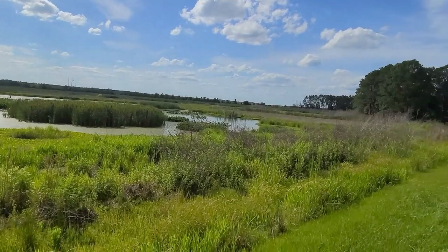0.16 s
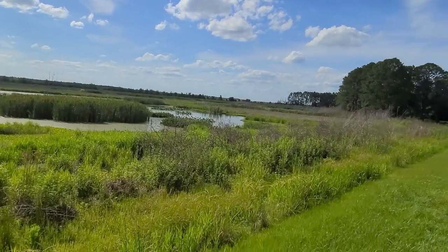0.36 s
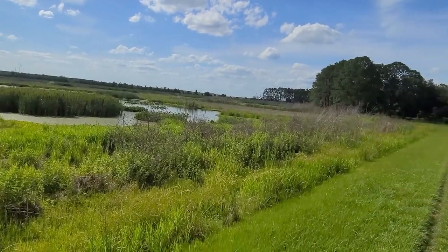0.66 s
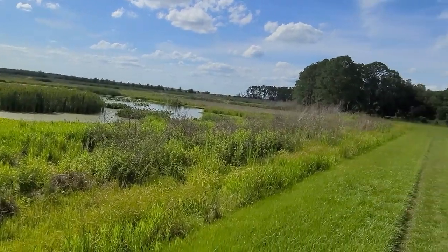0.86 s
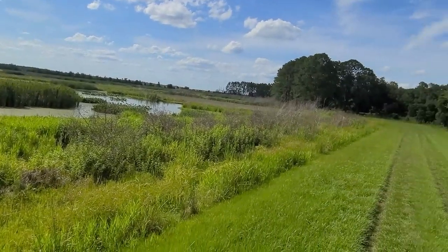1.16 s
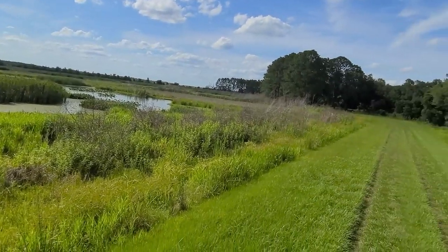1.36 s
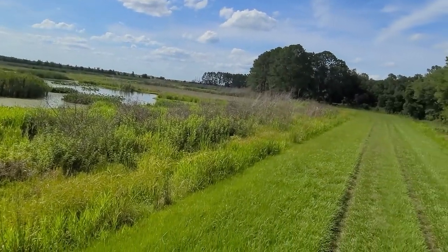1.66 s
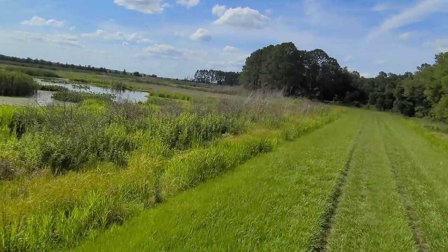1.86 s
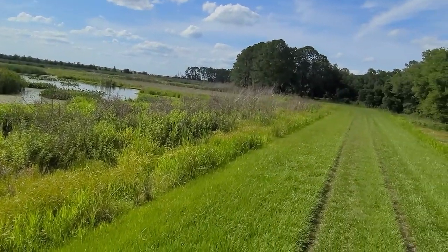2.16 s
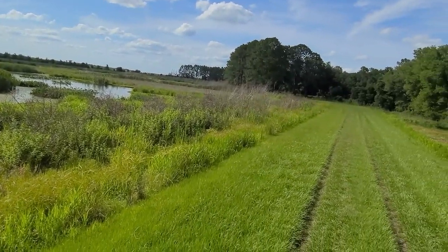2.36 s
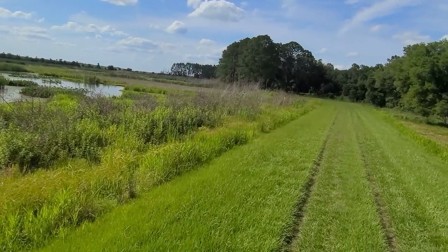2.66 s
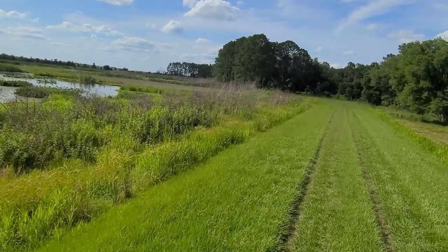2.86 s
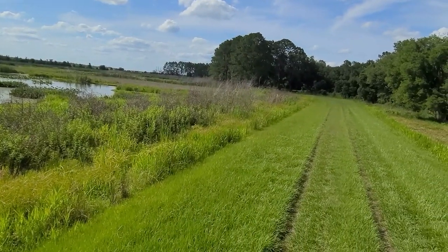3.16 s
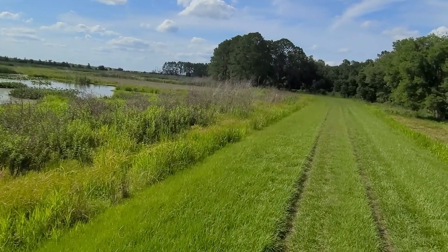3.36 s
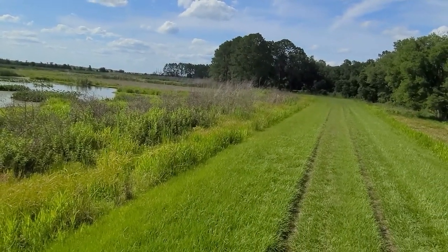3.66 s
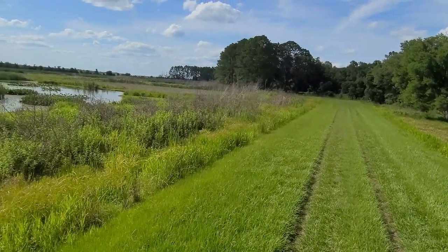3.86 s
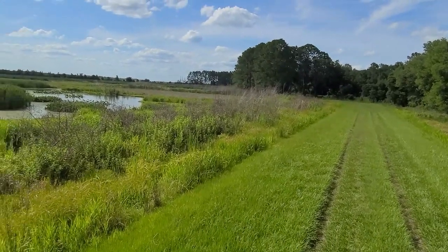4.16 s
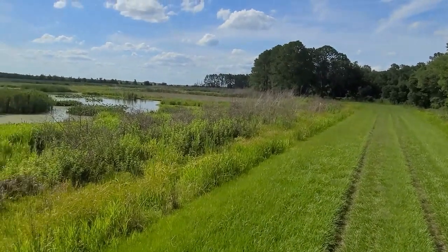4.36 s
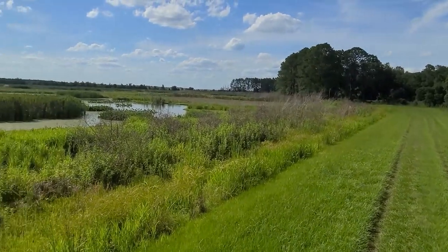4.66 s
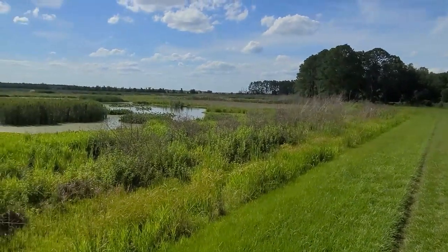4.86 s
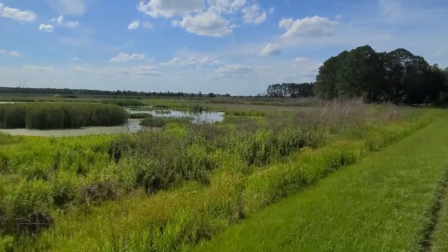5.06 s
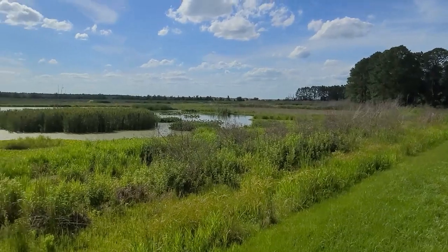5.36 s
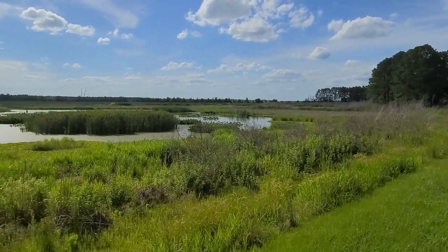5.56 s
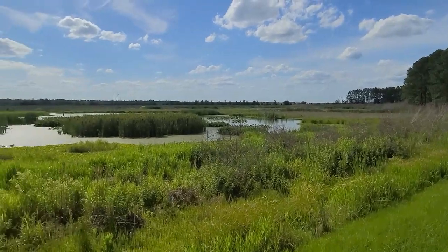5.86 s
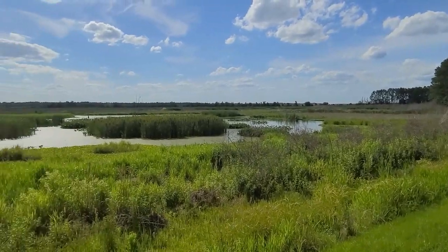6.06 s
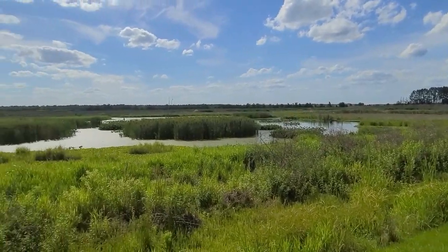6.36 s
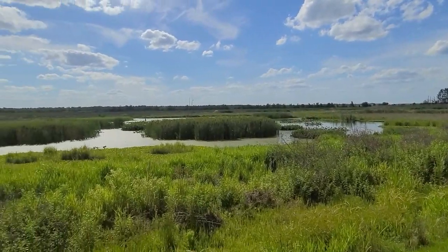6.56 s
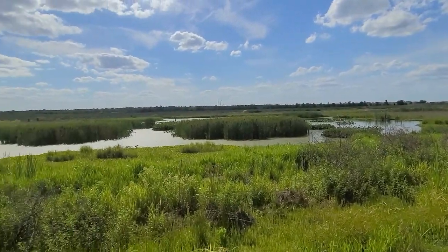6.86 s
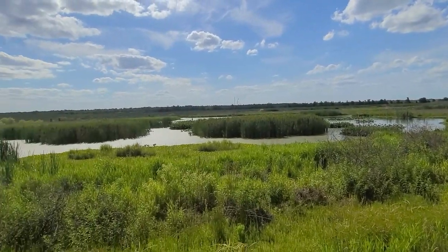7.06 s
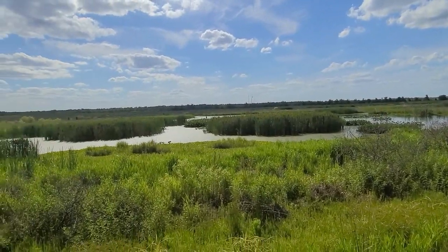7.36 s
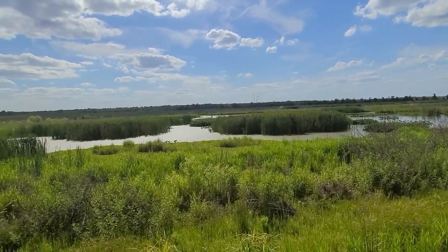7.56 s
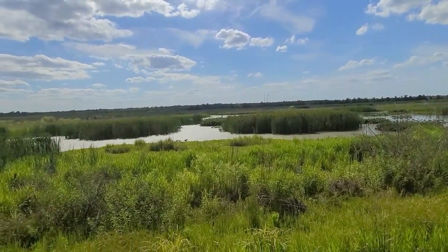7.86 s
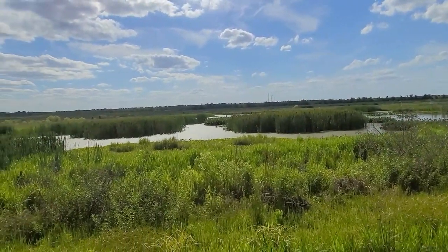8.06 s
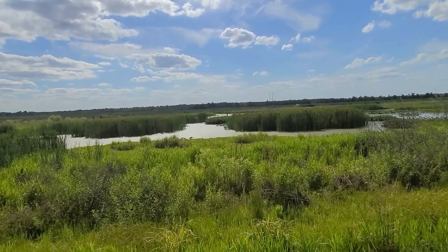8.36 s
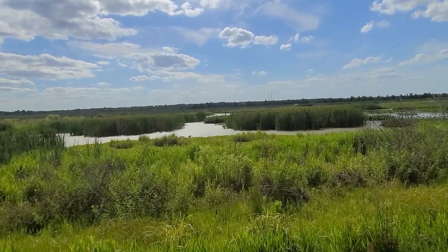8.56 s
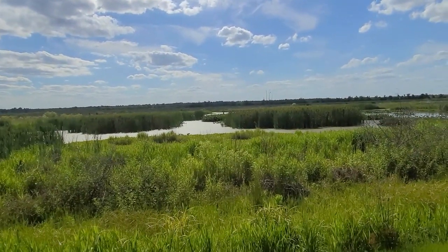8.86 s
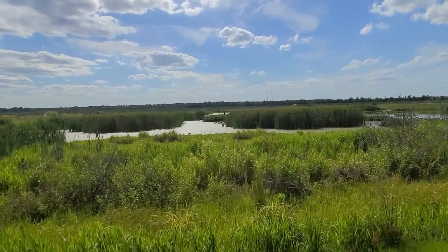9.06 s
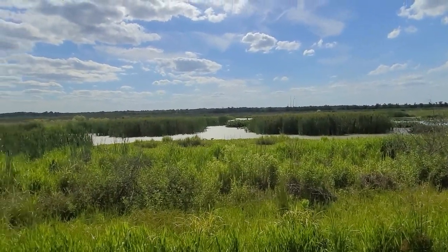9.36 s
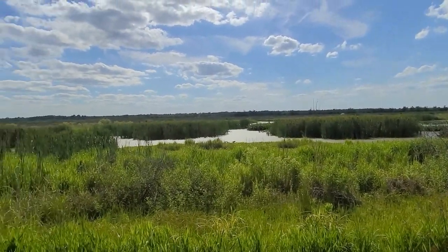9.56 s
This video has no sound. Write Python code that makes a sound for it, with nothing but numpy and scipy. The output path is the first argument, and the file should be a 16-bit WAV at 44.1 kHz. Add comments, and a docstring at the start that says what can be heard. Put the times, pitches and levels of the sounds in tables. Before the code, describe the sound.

High insect buzz hangs over an open marsh while low wind gusts rumble, birds whistle and twitter faintly, and handling clicks crowd the end.

```python
"""An open marsh: katydids buzz in the grass beside it, heard from a hand-held camera that pans slowly.
Two near katydids rasp by scraping a file of teeth, over a far chorus of coloured noise.
A bird whistles slurred notes on gliding sines; a farther songbird twitters.
Gusts of low noise rumble on the microphone and die down, over a breeze and a wash of far air.
The case clicks and bumps in the hand as ringing modes and noise puffs; fingers rub it in tiny slips."""
import sys
import numpy as np
from scipy import signal
from scipy.fft import rfft, irfft, next_fast_len
from scipy.io import wavfile
from scipy.ndimage import uniform_filter1d

SR = 44100
rng = np.random.default_rng(int(sys.argv[2]) if len(sys.argv) > 2 else 0)


def digitize_waveform(pressure):
    """Quantize a signal to 16-bit integers and store it at the path in sys.argv[1].

    Rows of a 2-D input are taken as channels; values are limited to [-1, 1].
    """
    field = np.atleast_2d(pressure).T
    bounded = np.clip(field, -1, 1)
    quanta = np.round(bounded * 32767).astype(np.int16)
    wavfile.write(sys.argv[1], SR, quanta)


N = 428192
T = np.arange(N) / SR  # [s]

# Spectra below set colour only: their levels are relative. Layer levels are before any trim in the mix.

# wing stroke of the steady katydid: (share of cycle, pitch [Hz], relative level [dB])
STEADY_STROKE = [(0, 9590, -23), (.1, 9943, -2.5), (.25, 10300, -6), (.4, 10380, -6.5), (.52, 9790, -6.5),
                 (.66, 9180, -15), (.78, 9017, -24)]
# wing stroke of the verse singer, before each verse's pitch factor: (share of cycle, pitch [Hz], relative level [dB])
VERSE_STROKE = [(0, 8720, 2.5), (.08, 8370, -2.5), (.22, 8045, -4), (.36, 7650, 0), (.52, 7080, -21)]
# loudness of the steady katydid: (time [s], level [dB])
STEADY_LEVEL = [(0, -63), (1.4, -55), (2.3, -62), (4, -71), (5.2, -51), (6.3, -55.5), (7.4, -58.5),
                (8.5, -52.5), (9.7, -56)]
# verses of the lower katydid, each held until a short pause before the next: (start [s], level [dB], pitch factor)
VERSES = [(-.2, -70, 0.91), (.48, -70, 0.92), (1.25, -66.5, 0.97), (2.12, -66.5, 0.97), (2.95, -64.5, 0.99),
          (3.74, -62.5, 1.04), (4.62, -61, 1.03), (5.5, -66.5, 0.98), (6.32, -62, .99), (7.22, -61.5, 1.04),
          (8.16, -59.5, 1.034), (9.02, -62, 1.02)]
VERSE_PAUSE_S = 0.09
STEADY_ECHO_DB, VERSE_ECHO_DB = -1, -3  # echoes relative to the direct sound

# long calls of the near bird: (start [s], level [dB], change of level from start to end [dB])
UPSLURS = [(0.071, -50, -2.5), (8.812, -60.5, -1), (9.555, -61, 14)]
# shape of that call, a dip and then a climb: (share of call, pitch [Hz], relative level [dB])
UPSLUR_SHAPE = [(0, 3100, -2), (.08, 3150, -0.5), (.16, 2950, -2), (.27, 2870, -11), (.35, 3060, -6),
                (.45, 3044, -8), (.52, 3200, 0.5), (.66, 3340, -2), (.8, 3650, -2), (1, 4570, -15)]
UPSLUR_S = 0.23  # length of the call
# short arched notes of the near bird:
# (start [s], length [s], start pitch [Hz], end pitch [Hz], arch [Hz], crest [share of length], level [dB])
NOTES = [(0, 0.071, 2280, 2310, 40, .5, -66.5), (0.571, 0.14, 1965, 1600, 35, 0.46, -72),
         (1.022, 0.22, 1734, 1510, 290, 0.29, -63.5), (8.836, 0.069, 4380, 4340, 57, .3, -60),
         (9.078, 0.041, 1790, 1614, 11, .5, -58), (9.295, 0.046, 2120, 2140, 190, .5, -58),
         (9.438, 0.11, 2150, 2230, 112, 0.62, -58.5)]
# twitters of the far songbird: (time [s], start pitch [Hz], end pitch [Hz], level [dB])
TWITTERS = [(2.07, 4000, 3700, -72), (2.28, 3770, 3340, -67), (2.51, 3230, 3650, -71),
            (4.15, 2770, 3240, -70.5), (4.85, 2750, 3200, -68), (4.925, 2720, 2470, -70),
            (5.03, 2850, 2550, -67), (5.085, 2810, 3250, -65), (5.263, 2740, 2610, -65.5),
            (5.318, 2840, 3250, -63), (5.485, 3700, 2600, -63.5), (5.558, 2930, 3150, -69),
            (5.605, 3400, 3620, -70), (5.795, 3150, 2980, -72)]
PITCH_WAVER = .006  # rms share by which a whistle's pitch trembles

# colour of the wind in a gust: (frequency [Hz], density [dB per Hz])
BUFFET = [(3, -7), (15, -16), (40, -5), (68, 3.5), (100, -5.5), (135, -21.5), (180, -32.5), (300, -48.5),
          (1000, -100)]
# colour of the wind between gusts: (frequency [Hz], density [dB per Hz])
BREEZE = [(3, -50), (15, -10), (35, -1), (62, 3), (85, -7.5), (120, -16.5), (200, -36.5), (800, -91)]
# light breeze that never stops: (time [s], level [dB])
BREEZE_LEVEL = [(0, -41.5), (1.5, -41), (2.2, -42.5), (3.5, -40), (4.7, -49), (6.7, -50.5), (7.3, -47),
                (9.7, -46)]
# gusts on top of the breeze: (middle [s], length [s], level [dB])
GUSTS = [(.34, 0.09, -31), (.475, 0.065, -29), (.665, 0.15, -29), (.94, 0.044, -37.5), (1.11, 0.055, -29),
         (1.84, 0.19, -37.5), (2.54, 0.093, -28), (2.94, 0.2, -28.5), (3.4, 0.22, -34), (3.635, 0.079, -30),
         (3.755, 0.045, -29), (4.135, 0.04, -34), (7.18, 0.42, -42), (7.77, 0.33, -41), (8.9, 0.3, -43)]
# side that the wind strikes: (time [s], left minus right [dB])
WIND_SIDE = [(0, -4.5), (1.8, -5.5), (2.1, 2.5), (3.8, 1), (4.1, -10.5), (5.2, -1), (9.7, 1.5)]

# snaps of the case under the hand: (time [s], crack level [dB], brightness [dB per octave], knock level [dB])
SNAPS = [(0.5488, -23, 1.4, -32), (1.9429, -34, -1, -33.5), (4.2937, -27, 1.5, -45.5),
         (6.535, -36, -3, -42), (6.791, -40.5, -4, -50), (6.8014, -31, 1, -42.5), (6.8345, -41.5, -2, -46),
         (6.9094, -37, 2, -46), (6.948, -46, 0, -49), (6.9684, -38, -6, -44.5), (7.354, -50, 2, -50),
         (7.659, -44, -5, -44), (7.8657, -44.5, 0, -44), (7.9328, -38, 1.5, -54), (8.019, -42.5, 2.5, -52),
         (8.0577, -41, -5, -48), (8.0871, -37, -3.5, -42), (8.1296, -36, -2, -48), (8.171, -34, -4, -40),
         (8.1822, -29.5, .5, -50), (8.2016, -35.5, -7, -34.5), (8.2227, -36, -7, -39.5),
         (8.273, -39, 2.5, -51), (8.3258, -34, -1.5, -47), (8.358, -54, -9, -43.5), (8.7, -37.5, 0.5, -46),
         (8.758, -33, -5.5, -41), (8.8906, -44, -3, -35.5), (8.9854, -37.5, 0, -46), (8.997, -37, -6, -41),
         (9.1998, -44, -11, -43.5), (9.303, -42, -8, -44), (9.3455, -38, -10, -43), (9.407, -41, -1, -41),
         (9.4156, -33.5, -4, -38.5), (9.6438, -37.5, -1.5, -48)]
# dull bumps of the hand against the case: (time [s], level [dB])
BUMPS = [(7.177, -41), (7.1912, -34.5), (8.2011, -32.5)]
# hollow modes of the case, varied at each strike: (frequency [Hz], level [dB], t60 [s])
KNOCK_MODES = [(222, -11, 0.054), (446, 1.5, 0.056), (588, -8, 0.026)]
# ringing modes of its shell, varied at each strike: (frequency [Hz], level [dB], t60 [s])
SHELL_MODES = [(1182, -7.5, 0.071), (1450, -10, 0.08), (1735, 1, 0.035), (2455, -4.5, 0.025),
               (2720, -6, 0.057), (3004, -2, 0.041), (3324, -6, 0.051), (4000, -8, 0.033),
               (4440, -1.5, 0.03), (7070, -5, 0.012)]
# colour of a sharp crack: (frequency [Hz], density [dB per Hz])
CRACK = [(100, -25), (800, -10), (1300, 3), (1750, 5), (2250, 3), (3200, 0.5), (4500, -3), (6000, -5),
         (11500, -10.5), (15000, -26)]
# colour of a dull bump: (frequency [Hz], density [dB per Hz])
BUMP = [(60, -8), (210, 4.5), (350, -3), (570, 4), (850, -14.5), (1400, -22), (3000, -28), (15000, -65)]
CRACK_T60_S = .03
SHELL_DETUNE, KNOCK_DETUNE = .015, .035  # rms share by which the grip shifts the modes
SETTLE_PER_S, SETTLE_DB, SETTLE_T60_S = 220, -20, .12  # small slips that follow a snap
TILT_FROM_HZ, TILT_PIVOT_HZ = 1000, 2500  # brightness slopes above the first, pivoting on the second
EDGE_HZ = 15800  # top of the band

# fingers shifting on the case: (middle [s], length [s], level [dB])
GRIPS = [(6.97, 0.1, -57.5), (7.44, 0.19, -57), (7.95, 0.29, -63), (8.22, 0.27, -53.5), (8.88, 0.36, -54.5),
         (9.56, 0.33, -58)]
# soft scuffs where the skin slides freely: (middle [s], length [s], level [dB])
SCUFFS = [(6.955, 0.078, -57), (7.49, 0.048, -54), (8.22, 0.056, -49.5)]
# colour of the rubbing: (frequency [Hz], density [dB per Hz])
RUB = [(50, -27), (170, 4), (300, -4), (460, 9), (620, 1), (850, -9.5), (1250, 1.5), (2000, -19),
       (3000, -10), (5000, -25), (15000, -43)]
SLIP_T60_S, SLIP_ECHO_DB = .04, 2

# colour of the far air: (frequency [Hz], density [dB per Hz])
AIR = [(80, -3), (180, -5), (300, 1), (480, -0.5), (750, -6), (1100, -11), (2000, -18.5), (3200, -20.5),
       (4500, -25.5), (6500, -30.5), (12000, -56)]
# loudness of the far air over the marsh: (time [s], level [dB])
AIR_LEVEL = [(0, -59.5), (3, -60.5), (6, -59.5), (7.5, -58), (9.7, -56)]
# stereo width of the far air: (time [s], share of unrelated noise [0-1])
AIR_WIDTH = [(0, 0.43), (1.3, 0.64), (4.1, 0.7), (4.5, 0.04), (6.5, 0.02), (7.3, 0.92), (9.7, 0.6)]
# colour of the faint hiss: (frequency [Hz], density [dB per Hz])
HISS = [(1000, -15), (4800, -4.5), (5500, 3), (6400, -4.5), (12000, -3), (14000, 1), (15600, 2.5)]
# colour of the far katydid chorus: (frequency [Hz], density [dB per Hz])
CHORUS = [(5000, -74), (6500, -61), (7000, -19), (7400, -16.5), (7900, -11.5), (8800, -10.5), (9300, -8),
          (9700, -1), (10000, -1), (10120, 1.5), (10230, 0), (10340, 4), (10480, -4.5), (10700, -8),
          (11000, -31), (11600, -60)]
# loudness of the far chorus: (time [s], level [dB])
CHORUS_LEVEL = [(0, -50), (1.4, -50), (2.4, -51.5), (4.2, -50.5), (5.2, -53.5), (6.5, -51), (8.3, -51.5),
                (9.7, -51)]
# likeness of diffuse noise at the two ports: (frequency [Hz], correlation [-1 to 1])
PORT_LIKENESS = [(60, 0.2), (110, 0), (170, 0.5), (280, 1), (500, 0.67), (740, 0.61), (1100, 0.3),
                 (2500, 0)]


def gain_of(db):
    """Decibels to amplitude."""
    return 10 ** (np.asarray(db) / 20)


def evened(x):
    """Scales to an rms of one."""
    return x / np.sqrt(np.mean(x ** 2) + 1e-20)


def read(points, hz):
    """Reads a spectrum table at any frequency, on a logarithmic pitch axis."""
    table_hz, value = np.transpose(points)
    return np.interp(np.log(hz + 1), np.log(table_hz + 1), value)


def follow(rows, t=T):
    """Every column of a curve at the times (or shares) t."""
    knots, *columns = np.transpose(rows)
    return [np.interp(t, knots, column) for column in columns]


def add(mix, s, sound):
    """Lays a sound into the mix at time s."""
    part = mix[..., max(round(s * SR), 0):][..., :sound.shape[-1]]
    part += sound[..., :part.shape[-1]]


def placed(x, left_db):
    """Sets the balance between the two ports, left minus right in dB."""
    return x * gain_of(np.array([left_db, -left_db]).reshape(2, -1) / 2)


def drift(hz):
    """Slow chance of rms one, moving up to about hz times a second."""
    count = int(2 * hz * T[-1]) + 4
    knots = signal.resample_poly(rng.standard_normal(count), up=4, down=1)
    return evened(np.interp(T, np.linspace(0, T[-1], len(knots)), knots))


def coloured(x, spectrum):
    """Filters by a spectrum table."""
    size = next_fast_len(x.shape[-1], True)
    gain = gain_of(read(spectrum, np.fft.rfftfreq(size, 1 / SR)))
    return irfft(rfft(x, size) * gain, size)[..., :x.shape[-1]]


def noise(spectrum, lag_s=0):
    """Diffuse noise whose likeness at the two ports varies with pitch, the left one late by lag_s."""
    hz = np.fft.rfftfreq(next_fast_len(N, True), 1 / SR)
    shared, private = rng.standard_normal((2, 2 * len(hz))).view(complex)
    same = np.clip(read(PORT_LIKENESS, hz), -1, 1)
    left = shared * np.exp(-2j * np.pi * hz * lag_s)
    right = same * shared + np.sqrt(1 - same ** 2) * private
    return evened(irfft(np.array([left, right]) * gain_of(read(spectrum, hz)))[:, :N])


def scattered(x, t60, wet_db, turn_s=0.6986):
    """The direct sound plus echoes from its surroundings, whose paths change as the camera turns."""
    t = T[:SR // 3]
    tails = rng.standard_normal((3, 2, len(t))) * gain_of(-60 * t / t60)
    tails /= np.linalg.norm(tails, axis=2, keepdims=True)
    # three sets of echoes fade into one another
    shares = np.cos(np.pi * (T / turn_s + np.arange(3)[:, None] / 3)) * np.sqrt(2 / 3)
    echoes = np.zeros((2, N))
    for share, tail in zip(shares, tails):
        echoes += signal.oaconvolve((x * share)[None], tail, axes=1)[:, :N]
    return (x + gain_of(wet_db) * echoes) / np.hypot(1, gain_of(wet_db))


def swells(rows, squareness):
    """Amplitude of pushes that each build, hold and let go; they add in power."""
    power = np.zeros(N)
    for middle, length, level_db in rows:
        power += gain_of(level_db) ** 2 * np.exp(-abs(2 * (T - middle) / length) ** squareness)
    return np.sqrt(power)


def katydids(swell_s=0.2, last_verse_s=0.76):
    """Two wing-raspers: one buzzes without a break, a lower one sings in verses."""
    steady = wings(STEADY_STROKE, strokes_hz=69.06, wander=0.00403, rasp=.013, unevenness_db=1.46)
    steady *= gain_of(follow(STEADY_LEVEL)[0] + 0.5)
    effort, pitch = np.zeros(N), np.ones(N)
    ends = [row[0] - VERSE_PAUSE_S for row in VERSES[1:]] + [VERSES[-1][0] + last_verse_s]
    for (start, level_db, factor), end in zip(VERSES, ends):
        from_edge_s = np.minimum(T - start, end - T)
        effort += gain_of(level_db) * np.sqrt(np.clip(from_edge_s / swell_s, 0, 1))
        pitch[T > start] = factor
    verses = effort * wings(VERSE_STROKE, strokes_hz=55.23, wander=.007, rasp=0.0239,
                            unevenness_db=-0.5, pitch=pitch)
    steady = placed(scattered(steady, t60=0.014, wet_db=STEADY_ECHO_DB), -1.2)
    return steady + placed(scattered(verses, t60=0.083, wet_db=VERSE_ECHO_DB), -1.7)


def wings(stroke, strokes_hz, wander, rasp, unevenness_db, pitch=1):
    """A scraper runs over a file once a cycle; its changing speed sweeps the pitch of each stroke."""
    cycle = np.cumsum(strokes_hz * (1 + wander * drift(8))) / SR % 1
    hz, level_db = follow(stroke, cycle)
    closing = cycle < stroke[-1][0]  # the wings open again in silence
    turns = np.cumsum(hz * pitch * (1 + rasp * drift(500))) / SR
    teeth = np.sin(2 * np.pi * turns)
    return evened(teeth * closing * gain_of(level_db + unevenness_db * drift(50)))


def birds(twitter_s=0.031, flutter_db=0.5, breakup_db=6):
    """A near whistler and a farther, more broken twitterer, each with its own echoes."""
    near, far = np.zeros((2, N))
    for s, *call in UPSLURS:
        add(near, s, upslur(*call))
    for s, *note in NOTES:
        add(near, s, slur(*note, ends_db=-6.5))
    for s, start_hz, end_hz, level_db in TWITTERS:
        add(far, s, slur(twitter_s, start_hz, end_hz, 0, .5, level_db, ends_db=0.5))
    near = near * evened(gain_of(flutter_db * drift(60)))  # a slight flutter in the near bird's notes
    far = far * evened(gain_of(breakup_db * drift(170)))  # the far bird's level breaks up
    near = placed(scattered(near, t60=0.14, wet_db=-7.0), -7.0)
    return near + placed(scattered(far, t60=0.16, wet_db=-2), -2)


def upslur(level_db, swell_db):
    """The pitch dips, then climbs while the voice swells and weakens along the call."""
    u = np.linspace(0, 1, round(UPSLUR_S * SR))
    hz, voice_db = follow(UPSLUR_SHAPE, u)
    return whistle(hz, level_db + voice_db + swell_db * u)


def slur(length, start_hz, end_hz, arch_hz, crest, level_db, ends_db):
    """A straight glide bowed upward by an arch, its ends set louder or softer than its middle."""
    u = np.linspace(0, 1, round(length * SR))
    bend = np.log(.5) / np.log(np.clip(crest, .1, .9))  # puts the top of the arch at the crest
    hz = start_hz + (end_hz - start_hz) * u + arch_hz * np.sin(np.pi * u ** bend)
    return whistle(hz, level_db + ends_db * (2 * u - 1) ** 2)


def whistle(hz, level_db):
    """A nearly pure tone on a pitch curve, a little unsteady, with soft ends."""
    turns = np.cumsum(hz * (1 + PITCH_WAVER * drift(60.2)[:len(hz)])) / SR
    tone = np.sqrt(2) * np.sin(2 * np.pi * turns)
    return gain_of(level_db) * tone * signal.windows.tukey(len(hz), .15)


def wind(gust_db=-38, span_db=4, steadiness=0.48):
    """Eddies buffet each port; stronger gusts reach higher in pitch."""
    breeze = gain_of(follow(BREEZE_LEVEL)[0])
    level_db = 20 * np.log10(np.hypot(breeze, swells(GUSTS, squareness=4.0)))
    gust = 1 / (1.0 + np.exp((gust_db - level_db) / span_db))  # share of gust colour
    eddies = np.sqrt(gust) * noise(BUFFET) + np.sqrt(1 - gust) * noise(BREEZE)
    power = uniform_filter1d(eddies ** 2, size=3000, axis=1)
    steadied = evened(eddies / power ** (steadiness / 2))  # partly levels the chance swells
    return placed(steadied, follow(WIND_SIDE)[0]) * gain_of(level_db + 3.0)


def snaps(bump_t60=0.089, rise_s=0.00045):
    """The case snaps, knocks and bumps: noise puffs with a bright shell ring and hollow low modes."""
    out, t = np.zeros((2, N)), T[:SR // 8]
    onset = 1 - np.exp(-t / rise_s)
    for s, crack_db, brightness, knock_db in SNAPS:
        tilt = [(hz, brightness * np.log2(hz / TILT_PIVOT_HZ)) for hz in (TILT_FROM_HZ, EDGE_HZ)]
        crack = gain_of(-5.0) * burst(CRACK, CRACK_T60_S, t)
        shell = crack + gain_of(-10.0) * ring(SHELL_MODES, t, SHELL_DETUNE, lead_turns=0.27)
        shell = onset * coloured(shell, tilt) * (t < t[-1] / 2)
        shell = signal.fftconvolve(shell, settling(t)[None], axes=1)[:, :len(t)]
        hollow = gain_of(4.5) * ring(KNOCK_MODES, t, KNOCK_DETUNE, lead_turns=.37)
        knock = onset * (hollow + gain_of(-7.5) * burst(BUMP, bump_t60, t))
        add(out, s, gain_of(crack_db) * placed(shell, -3.5) + gain_of(knock_db) * placed(knock, 3.1))
    for s, level_db in BUMPS:
        add(out, s, onset * gain_of(level_db) * burst(BUMP, bump_t60, t))
    return out


def ring(modes, t, detune, lead_turns, port_turns=0.059, uneven_db=2):
    """Decaying case modes, struck differently each time; flexing moves the two ports out of step."""
    hz, level_db, t60 = np.transpose(modes)[:, :, None]
    lead = np.array([lead_turns, 0])[:, None, None]
    lead = lead + port_turns * rng.standard_normal((2, *hz.shape))
    turns = hz * (1 + detune * rng.standard_normal(hz.shape)) * t + lead
    level_db = level_db + uneven_db * rng.standard_normal(hz.shape)
    return (gain_of(level_db - 60 * t / t60) * np.sin(2 * np.pi * turns)).sum(1)


def burst(spectrum, t60, t):
    """A dying puff of coloured noise at both ports."""
    puff = evened(coloured(rng.standard_normal((2, len(t))), spectrum))
    return puff * gain_of(-60 * t / t60)


def settling(t):
    """One full catch, then a dying scatter of small slips."""
    slips = (rng.random(len(t)) < SETTLE_PER_S / SR) * rng.standard_normal(len(t))
    return (t == 0) + slips * gain_of(SETTLE_DB - 60 * t / SETTLE_T60_S)


def fingers(slips_per_s=130, catches_per_s=70):
    """Fingers creep over the case in tiny random slips; the skin catches, or slides in a soft scuff."""
    chance = np.array([[slips_per_s], [catches_per_s]]) / SR
    slips, catches = (rng.random((2, N)) < chance) * rng.standard_normal((2, N))
    rub = evened(coloured(scattered(slips, SLIP_T60_S, SLIP_ECHO_DB), RUB))
    crackle = evened(coloured(scattered(np.tanh(catches), SLIP_T60_S, SLIP_ECHO_DB), CRACK))
    grip = (rub + gain_of(-10.5) * placed(crackle, -6)) * swells(GRIPS, squareness=15.0)
    scuff = noise(CRACK) * evened(gain_of(3.0 * drift(150))) * swells(SCUFFS, squareness=2.1)
    return grip + placed(scuff, -3.0)


def marsh():
    """Far air, faint hiss and the blur of countless distant katydids, all as coloured noise."""
    width = np.clip(follow(AIR_WIDTH)[0], 0, 1)
    unrelated = evened(coloured(rng.standard_normal((2, N)), AIR))
    air = np.sqrt(1 - width) * noise(AIR, lag_s=0.00038) + np.sqrt(width) * unrelated
    air = air * gain_of(follow(AIR_LEVEL)[0] + 4.0 + 0.81 * drift(6.5))
    hiss = noise(HISS) * gain_of(-64.0)
    chorus = noise(CHORUS) * gain_of(follow(CHORUS_LEVEL)[0] + 0.6 + 0.77 * drift(8))
    return placed(air, -1.55) + hiss + placed(chorus, -1.9)


def scene():
    """Everything that reaches the two ports."""
    return katydids() + birds() + wind() + snaps() + fingers() + marsh()


def record(dry):
    """A steep lowpass closes off the top of the band."""
    lowpass = signal.firwin(511, EDGE_HZ, window=("kaiser", 9), fs=SR)
    return signal.oaconvolve(dry, lowpass[None], "same")


dry = scene()
out = record(dry)
digitize_waveform(out)
```